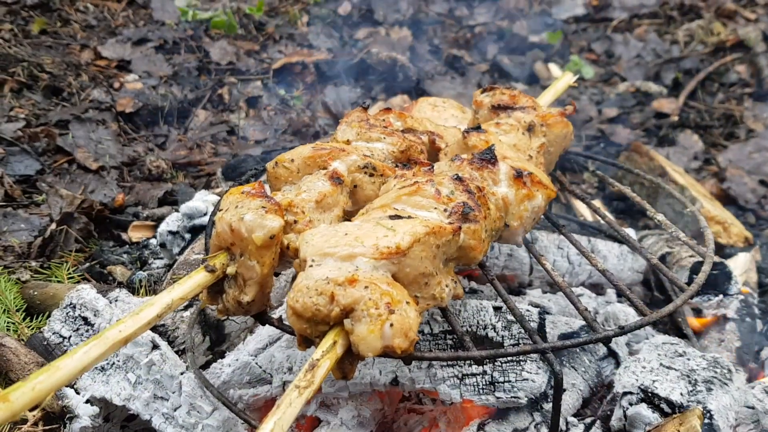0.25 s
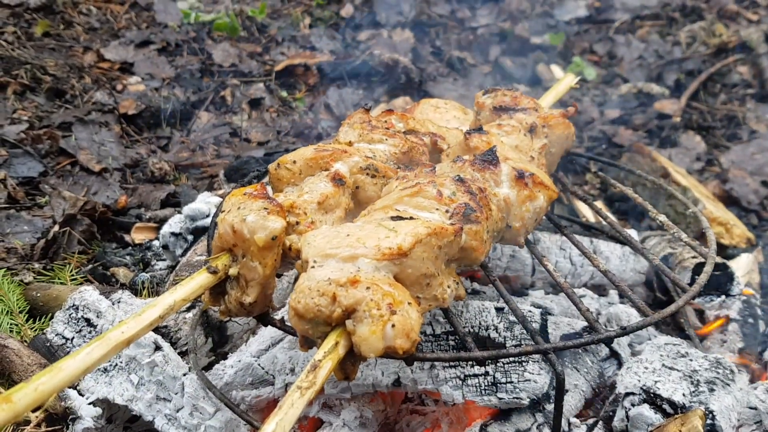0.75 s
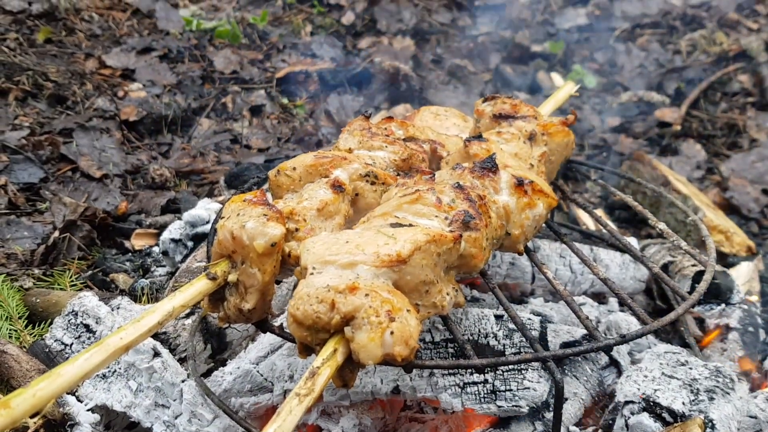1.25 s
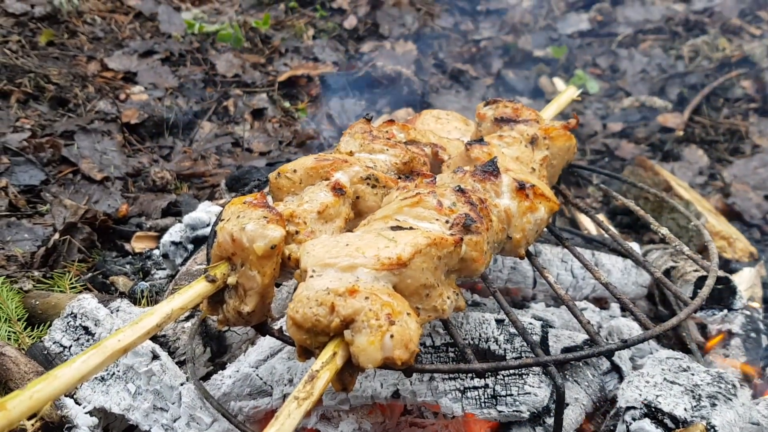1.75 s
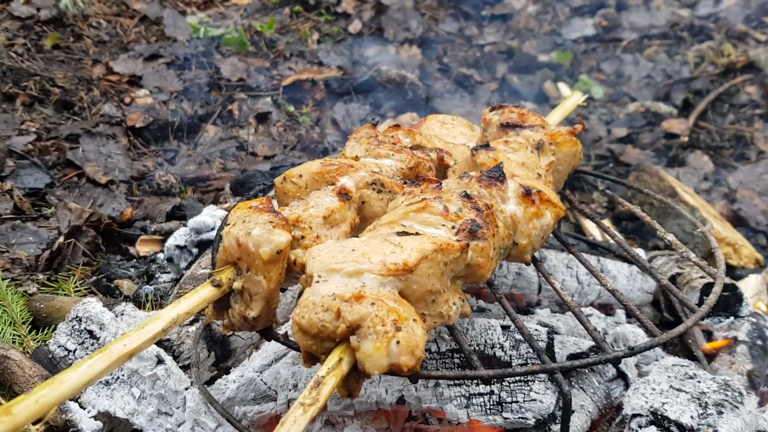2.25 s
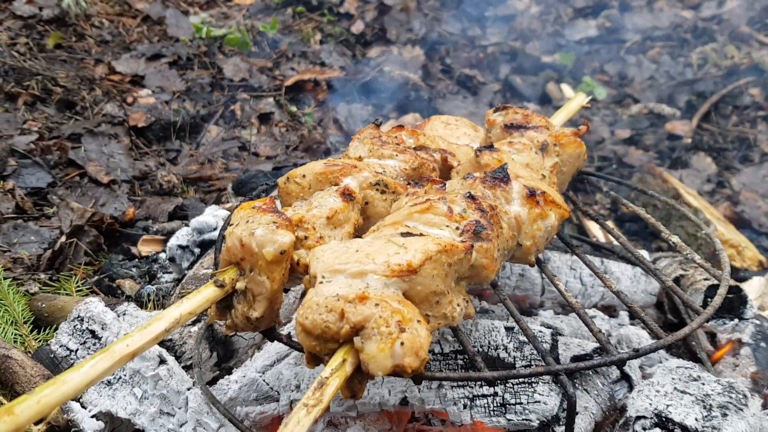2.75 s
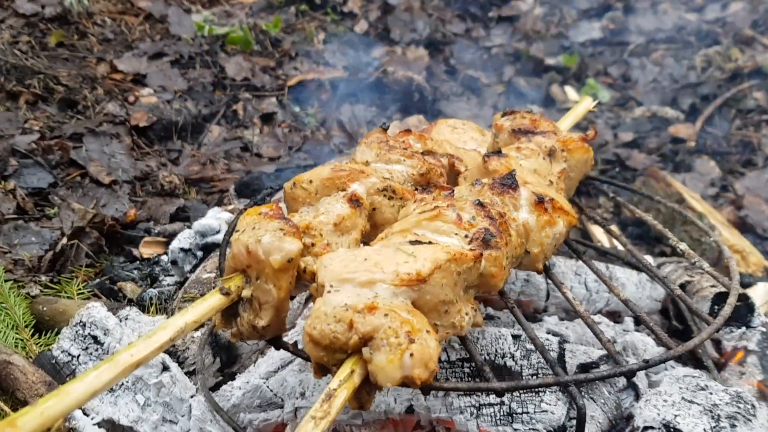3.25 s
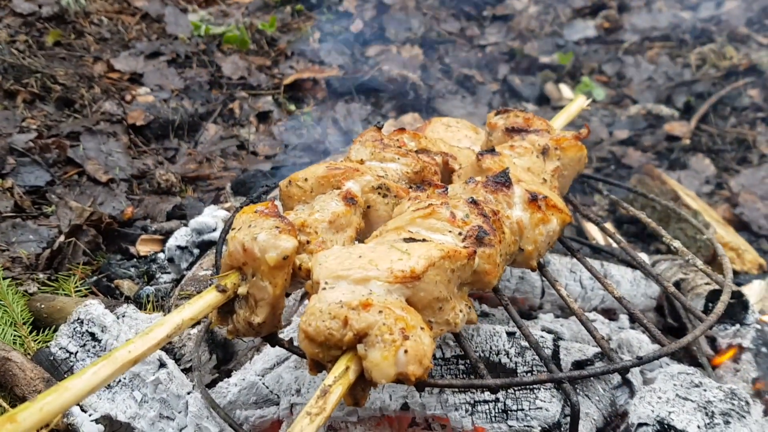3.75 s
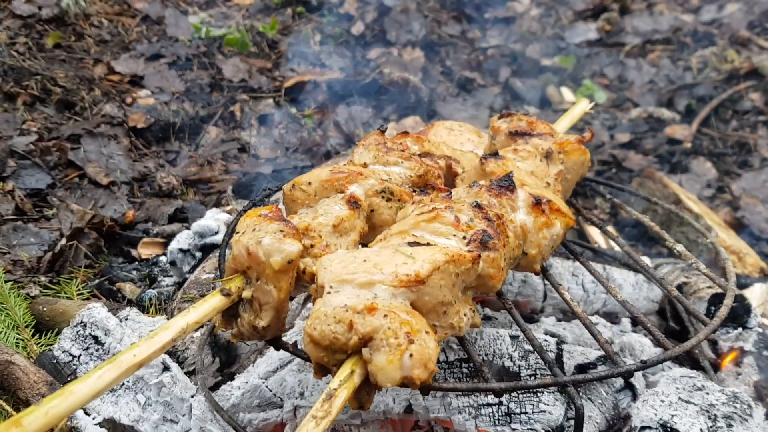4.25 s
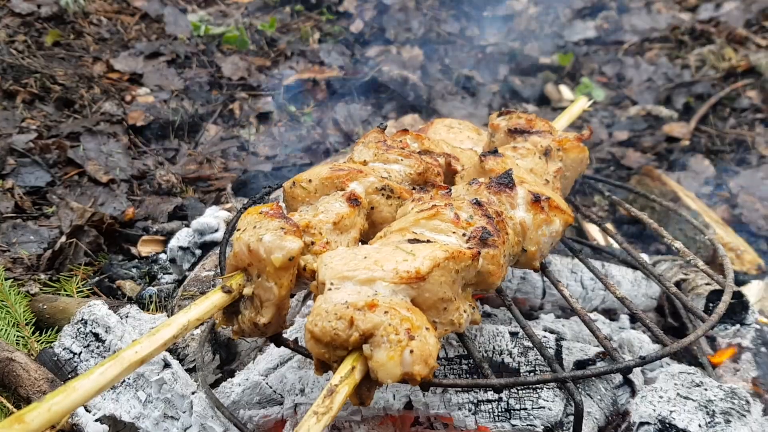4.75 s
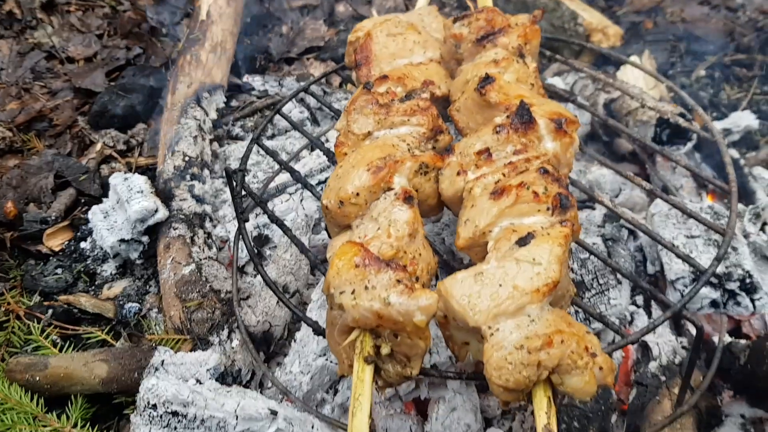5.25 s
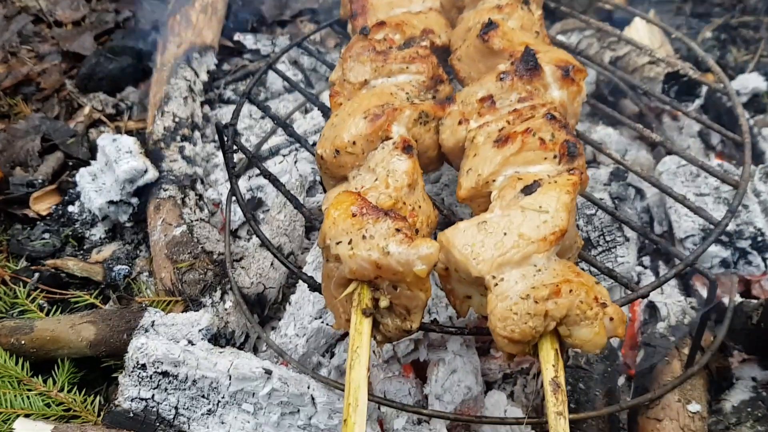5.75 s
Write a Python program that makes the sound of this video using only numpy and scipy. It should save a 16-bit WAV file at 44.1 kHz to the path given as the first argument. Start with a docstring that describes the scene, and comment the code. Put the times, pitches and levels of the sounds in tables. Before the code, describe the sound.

Hot charcoal crackles and snaps outdoors under quietly fizzing skewers of meat, with some handling noise and a faint low rumble.

```python
"""Outdoors in still forest air, at a campfire; a hand-held phone, two microphones, close above the grate.
Meat grills on skewers. Far back lie a deep rumble and a low drone; nearer, steam hisses from the wood.
Just below the phone fat fizzes, spurts and ticks on the embers, and the charcoal bursts with sharp pops.
Now and then fingers shift on the case, right beside the right microphone."""
import sys
import numpy as np
from scipy import signal
from scipy.fft import rfft, irfft
from scipy.io import wavfile

SR = 44100
rng = np.random.default_rng(int(sys.argv[2]) if len(sys.argv) > 2 else 0)


def master(y):
    """Save y as 16-bit WAV."""
    cut = np.clip(np.atleast_2d(y).T, -1, 1)
    pcm = np.round(cut * 32767)  # scale
    wavfile.write(sys.argv[1], SR, pcm.astype(np.int16))


N = 265041
TIME = np.arange(N) / SR


def undb(db):
    """Decibels to amplitude."""
    return 10 ** (np.asarray(db) / 20)


def unit(x):
    """Scale each channel to rms 1."""
    return x / np.sqrt(np.mean(x ** 2, axis=-1, keepdims=True))


def curve(rows, column=1):
    """One column of a table, joined by straight lines in time."""
    rows = np.array(rows)
    return np.interp(TIME, rows[:, 0], rows[:, column])


def add(track, s, sound):
    """Mix a sound into a track at time s."""
    start = int(round(s * SR))
    a, b = max(start, 0), min(start + sound.shape[-1], N)
    if b > a:
        track[..., a:b] += sound[..., a - start:b - start]


def butter(x, hz, kind, order=2):
    """Causal low-pass or high-pass."""
    return signal.sosfilt(signal.butter(order, hz, kind, fs=SR, output="sos"), x)


def resonate(x, hz, width_hz):
    """Two like damped resonances in series, gain 1 at their centre."""
    b, a = signal.iirpeak(hz, hz / width_hz, fs=SR)
    return signal.lfilter(b, a, signal.lfilter(b, a, x))


def colour(x, points, size=8192):
    """Causal filter through (Hz, dB) points, from the cepstrum of its gain."""
    hz, db = np.transpose(points)
    gain = undb(np.interp(np.log(np.fft.rfftfreq(size, 1 / SR) + 1), np.log(hz), db))
    cepstrum = irfft(np.log(gain))
    cepstrum[1:size // 2] *= 2
    cepstrum[size // 2 + 1:] = 0
    return signal.fftconvolve(x, irfft(np.exp(rfft(cepstrum))))[:len(x)]


def wander(per_s):
    """Smooth random drift with a spread near 1."""
    knots = rng.standard_normal(2048)
    return np.interp(TIME * per_s, np.arange(len(knots)), knots)


def fade(t, t60):
    """Exponential decay, 60 dB down at t60."""
    return np.exp(-np.log(1000) * t / t60)


def gate(s, length, edge):
    """A soft gate; edge is the share of its length spent rising and falling."""
    opening = np.zeros(N)
    add(opening, s, signal.windows.tukey(int(length * SR), edge))
    return opening


def spread(make, apart):
    """Two channels that share one sound and each have some of their own."""
    shared = make()
    return np.array([unit(shared + apart * make()) for _ in range(2)])


def grains(per_s, scatter_db):
    """A rain of tiny clicks, a few larger than the rest."""
    size = undb(scatter_db * np.minimum(rng.exponential(size=N), 5))
    return unit((rng.random(N) < per_s / SR) * size * rng.standard_normal(N))


def place(s, sound, lag_ms, pan_db_per_ms=3.5):
    """A sound from one spot in the coal bed: later and softer at the farther microphone."""
    out = np.zeros((2, N))
    pan_db = pan_db_per_ms * lag_ms
    add(out[0], s, sound[0] * undb(pan_db / 2))
    add(out[1], s + lag_ms / 1000, sound[1] * undb(-pan_db / 2))
    return out


def burst(thump_db, ring_db, snap_db, splinter_db, ring_hz, ring_width=1500, puff_s=0.00082,
          knock_hz=680, knock_width=650, knock_share=0.22, snap_hz=4350, snap_width=2000,
          scatter=0.16, scatter_t60=0.011, splinter_t60=0.018):
    """One sudden break, in stereo: a pressure puff, a hollow ring, a brittle snap and splinters."""
    t = np.arange(4096) / SR
    grit = rng.standard_normal((3, 2, len(t)))
    tail = 0.027 * fade(t, t60=0.11)
    # one sharp fracture, then its scatter from the coal bed and the ground
    fracture = (t == 0) + scatter * grit[:2] * (fade(t, scatter_t60) + tail)
    # the puff swings below zero as the air flows back; the whole lump knocks with it
    puff = butter(butter(np.exp(-t / puff_s), 115, "high"), 1900, "low")
    knock = resonate(fracture[1], knock_hz, knock_width)
    thump = unit(puff) + knock_share * unit(knock)
    ring = resonate(fracture[0], ring_hz, ring_width)
    # the snap swings against the ring, which leaves a hollow between the two
    snap = -resonate(fracture[0], snap_hz, snap_width)
    chips = 3.2 * grit[2] * np.abs(grit[2])  # many specks, a few larger pieces
    spray = 14 * (t == 0) + chips * (fade(t, splinter_t60) + tail)
    splinters = butter(spray, 7400, "high", order=3)
    parts = ((thump, thump_db - 1.0), (ring, ring_db + 1.2),
             (snap, snap_db + 0.098), (splinters, splinter_db - 0.5))
    level_window = 0.005 * SR  # levels count each part's energy as if packed into 5 ms
    return sum(unit(x) * undb(db) for x, db in parts) * np.sqrt(level_window / len(t))


# Deep outdoor rumble, all around: (frequency [Hz], gain [dB])
RUMBLE_SPECTRUM = [(20, -34.5), (32, -1), (45, 5), (60, 4.5), (80, -0.5), (130, -10.5), (200, -15.5),
                   (300, -23.5), (500, -41), (1000, -62)]
# Low drone in the background: (time [s], pitch [Hz])
DRONE_PITCH = [(0, 43.2), (2.6, 44.4), (3.1, 50.47), (3.6, 52.1), (4.8, 52.3), (5.1, 44.15), (5.6, 46.3),
               (6.01, 43.7)]
# Swells of the drone: (start [s], length [s], rise [dB])
DRONE_SWELLS = [(2.554, 0.29, 8.5), (2.977, 2.75, 6), (5.462, 0.243, 7)]


def rumble_and_drone(rumble_db=-57, drone_db=-53.5, throb_db=3.0, edge_s=0.053):
    """A low drone wavers and throbs; the rumble swells with it, about half as far."""
    rise_db = sum(db * gate(s, length, edge=2 * edge_s / length) for s, length, db in DRONE_SWELLS)
    rumble = spread(lambda: colour(rng.standard_normal(N), RUMBLE_SPECTRUM), apart=0.45)
    rumble *= undb(rumble_db + 0.48 * rise_db)
    pitch_hz = curve(DRONE_PITCH) + 0.87 * wander(14)
    drone = np.sin(2 * np.pi * np.cumsum(pitch_hz) / SR)
    return rumble + drone * undb(drone_db + rise_db + throb_db * wander(12))


# Draught at the fire: (frequency [Hz], gain [dB])
DRAUGHT_SPECTRUM = [(150, -1), (400, -9.5), (850, -2), (1400, -2.5), (2650, -12.5), (3100, -22),
                    (6000, -28)]
# The fire's steady activity: (time [s], relative sizzle level [dB], relative draught level [dB])
FIRE_ACTIVITY = [(0.0, -75, -72), (1.2, -75.5, -74.5), (1.45, -75, -69.5), (1.72, -67, -75),
                 (2.16, -74, -74.5), (2.84, -71, -76), (3.1, -71, -70), (3.62, -76, -77.5),
                 (4.12, -75.5, -72.5), (4.82, -74, -77.5), (4.99, -72.5, -69), (5.29, -68, -72.5),
                 (5.71, -76.5, -72), (6.01, -76.5, -73.5)]


def draught(gain_db=4.5, flicker_db=2.36):
    """Moving air murmurs softly and unevenly."""
    murmur = spread(lambda: colour(rng.standard_normal(N), DRAUGHT_SPECTRUM), apart=2.24)
    return murmur * undb(curve(FIRE_ACTIVITY, column=2) + gain_db + flicker_db * wander(8.9))


def steam_whistle(start_s=0.7, length_s=1.26, level_db=-72, hz=4700, sag_hz_per_s=410, width_hz=260):
    """A narrow crack sings: a thin band of hiss whose pitch sags as the pressure runs out."""
    phase = 2 * np.pi * np.cumsum(hz - sag_hz_per_s * (TIME - start_s)) / SR
    flutter = lambda: butter(rng.standard_normal(N), width_hz / 2, "low")
    tone = spread(lambda: flutter() * np.sin(phase) + flutter() * np.cos(phase), apart=0.76)
    return tone * undb(level_db) * gate(start_s, length_s, edge=0.15)


# Faint steam under the grate: (start [s], length [s], centre [Hz], resonance width [Hz], level [dB])
STEAM_JETS = [(-.2, 1.42, 3340, 1550, -64.5), (1.2, 1.77, 3240, 1480, -69),
              (4.168, 0.21, 3470, 1500, -68.5)]


def steam_hiss():
    """Steam escapes from narrow cracks in the wood, each hissing at its own pitch."""
    out = np.zeros((2, N))
    for s, length, hz, width, db in STEAM_JETS:
        hiss = spread(lambda: resonate(rng.standard_normal(N), hz, width), apart=1.0)
        out += hiss * undb(db) * gate(s, length, edge=0.4)
    return out


# Handling noise, fingers sliding on the case: (peak time [s], level [dB], t60 [s])
FINGER_RUBS = [(2.901, -44, 0.26), (3.02, -46.5, 0.31), (3.12, -47, 1.78), (4.82, -56.5, 1.0),
               (5.04, -56, .6)]
# That rubbing, heard through the case: (frequency [Hz], gain [dB])
RUB_SPECTRUM = [(40, 0), (100, 11), (300, -6), (700, -12.5), (1500, -17), (2500, -19.5), (5000, -15.5),
                (12000, -42)]
# Taps right beside the right microphone: (time [s], level [dB], hardness [dB])
FINGER_TAPS = [(.9925, -50.5, -2), (2.9091, -36, -5), (2.9687, -53, 7), (3.0023, -47.5, -2),
               (3.081, -50.5, 6), (3.0833, -49, 12), (3.0932, -47, 5), (3.105, -35.5, 1.5),
               (3.1182, -53.5, 13), (3.142, -54, -2), (3.4548, -57.5, 16), (4.0945, -55, -5),
               (4.803, -61, -16), (5.035, -57.5, -19), (5.1062, -55.5, -13)]
# The grip bumps the case: (time [s], level before the low-pass [dB], pitch [Hz], t60 [s])
GRIP_BUMPS = [(2.909, -48, 130, .025), (3.012, -33.5, 60, 0.24), (3.251, -46, 349.7, 0.018),
              (3.312, -31, 306, 0.012), (3.325, -43, 332, 0.016), (3.369, -39, 331, 0.013),
              (5.033, -23.5, 111, 0.044)]


def fingers(leak_db=-22, rub_rise_db_per_s=450, case_hz=1340):
    """Rubs, taps and bumps travel through the case, almost only to the right microphone."""
    pressure = np.zeros(N)
    for s, db, t60 in FINGER_RUBS:
        rise = undb(db - rub_rise_db_per_s * np.maximum(s - TIME, 0))
        pressure += rise * fade(np.maximum(TIME - s, 0), t60)
    case = unit(colour(grains(per_s=1800, scatter_db=3.0), RUB_SPECTRUM)) * pressure
    for s, db, hard_db in FINGER_TAPS:
        tap = burst(thump_db=db, ring_db=db - 5, snap_db=db + hard_db - 5.5,
                    splinter_db=db + hard_db - 8.5, ring_hz=case_hz, puff_s=0.00016,
                    knock_hz=950, knock_share=0.59, scatter=0.17, scatter_t60=0.018)
        add(case, s, tap[0])
    t = TIME[:SR // 2]
    for s, db, hz, t60 in GRIP_BUMPS:
        bump = np.sin(2 * np.pi * hz * t) * fade(t, t60)
        add(case, s, undb(db) * butter(bump, 520, "low"))
    return np.array([case * undb(leak_db), case])


# Boiling fat at close range: (frequency [Hz], gain [dB])
SIZZLE_SPECTRUM = [(600, -15.5), (1500, -5), (2300, 3.5), (2750, 4.5), (3200, -2.5), (3900, 1), (4600, 4.5),
                   (6800, -6.5), (8200, -8), (12000, -5.5), (15500, -5.5)]
# Fat spurting onto the embers: (start [s], length [s], level [dB])
FAT_SPURTS = [(1.231, .13, -61), (1.39, .13, -58.5), (1.648, 0.043, -57.5), (1.704, 0.05, -52),
              (1.807, 0.043, -62), (2.364, 0.015, -56.5), (2.488, 0.06, -57.5), (2.801, 0.047, -53),
              (5.855, 0.027, -58.5)]


def sizzle(gain_db=8, flicker_db=1.0, spit_db=-3):
    """Countless fat bubbles burst, a few spit on their own, and drips on the embers add dense spurts."""
    bubbles = spread(lambda: colour(grains(per_s=5500, scatter_db=1.5), SIZZLE_SPECTRUM), apart=1.0)
    spits = spread(lambda: colour(grains(per_s=110, scatter_db=0.5), SIZZLE_SPECTRUM), apart=0.35)
    fizz = spread(lambda: colour(grains(per_s=4500, scatter_db=3.5), SIZZLE_SPECTRUM), apart=0.45)
    spurts = sum(undb(db) * gate(s, length, edge=0.27) for s, length, db in FAT_SPURTS)
    heat_db = curve(FIRE_ACTIVITY)
    # the harder the fat boils, the more the single spits stand out
    spits *= undb(spit_db + 0.5 * (heat_db - heat_db.max()))
    return (bubbles + spits) * undb(heat_db + gain_db + flicker_db * wander(30)) + fizz * spurts


# Drops on the embers, one spot under the meat: (time [s], level [dB], ring above that level [dB])
FAT_TICKS = [(0.211, -53.5, -13), (1.305, -52, -4.5), (1.3732, -56, -8), (1.3971, -54.5, -7),
             (1.4872, -51.5, -1.5), (1.5258, -58, -1), (1.7026, -50, -4), (1.825, -54.5, 1),
             (1.8381, -52.5, -10), (1.9148, -47, -2), (2.0218, -61.5, -1), (2.0881, -57, -12),
             (2.1146, -55.5, 0.5), (2.365, -58.5, 9), (2.371, -58.5, 7), (2.4378, -56, 2),
             (2.4893, -51.5, 3), (2.534, -51, -1.5), (2.888, -46, -8), (3.2417, -58.5, -4),
             (3.4827, -57, 3.5), (4.3987, -48, -31), (5.1278, -55.5, -11), (5.363, -59, 1.5),
             (5.8416, -52, -5)]


def fat_ticks():
    """Drops of fat burst like tiny pops: all snap and spray, hardly any thump."""
    out = np.zeros((2, N))
    for s, db, ring_db in FAT_TICKS:
        tick = burst(thump_db=db - 14.5, ring_db=db + ring_db, snap_db=db - 1, splinter_db=db - 1,
                     ring_hz=2580, ring_width=1730, snap_hz=4620, snap_width=2900,
                     scatter=0.21, splinter_t60=0.014)
        out += place(s, tick, lag_ms=0.05)
    return out


# Coals bursting close below the microphones: (time [s], level [dB], thump above that level [dB],
# brittleness [dB], knock [Hz], ring [Hz], lag at the right microphone [ms])
COAL_POPS = [(1.2379, -45.5, 5, -1, 425, 2370, -0.081), (1.2446, -45.5, 8, 2, 430, 1500, -0.045),
             (1.5813, -36.5, -11.5, -4.5, 440, 1850, .42), (4.1237, -58, 2, -2, 700, 1570, -0.34),
             (4.3248, -53, -1.5, 2, 687, 2060, 0.13), (4.9966, -47.5, 2.5, -1.5, 755, 2000, 0.22),
             (5.2695, -29.5, -1, -3, 720, 2050, 0.077), (5.6755, -61, 10, -2, 650, 1462, .02),
             (5.8133, -26.5, -2, 5, 740, 1920, -0.074)]


def coal_pops(big_pop_db=-27.5, echo_s=0.002935, echo_db=-11.5, echo_hz=1100):
    """Each coal bursts at its own spot in the bed, followed by one short, dull, inverted echo."""
    out = np.zeros((2, N))
    for s, db, thump_db, brittle_db, knock_hz, ring_hz, lag_ms in COAL_POPS:
        knock_db = -5.5 + 0.35 * (db - big_pop_db)  # bigger pops knock more
        snap_db = db - 2 - 0.76 * brittle_db  # a brittle coal snaps less and splinters more
        splinter_db = db - 8 + brittle_db
        pop = burst(db + thump_db, db, snap_db, splinter_db, ring_hz,
                    knock_hz=knock_hz, knock_width=530, knock_share=undb(knock_db))
        out += place(s, pop, lag_ms)
    add(out, echo_s, -undb(echo_db) * butter(out, echo_hz, "low"))
    return out


def scene():
    """Everything that reaches the phone above the grate, left and right."""
    grill = coal_pops() + fat_ticks() + sizzle() + steam_hiss() + steam_whistle()
    background = draught() + rumble_and_drone()
    return grill + background + fingers()


# The phone's two microphone ports: (frequency [Hz], left gain [dB], right gain [dB])
PORT_RESPONSE = [(104, 0, -0.5), (834, 1.5, 2.5), (1040, -1.5, 1), (1700, -5.5, 2.5), (2550, -2.5, 6),
                 (3160, -8, -3), (4700, -6, -5), (6870, 6.5, -6), (8050, -3, -38.5), (9740, 2.5, -5),
                 (12960, 6, -1), (16100, -5, 3)]


def record(dry, top_hz=15900):
    """Each port has its own resonance and notch; the phone cuts the top."""
    hz, *sides = np.transpose(PORT_RESPONSE)
    heard = np.array([colour(x, np.transpose([hz, db])) for x, db in zip(dry, sides)])
    return signal.sosfilt(signal.ellip(10, 0.2, 70, top_hz, fs=SR, output="sos"), heard)


dry = scene()
out = record(dry)
master(out)
```